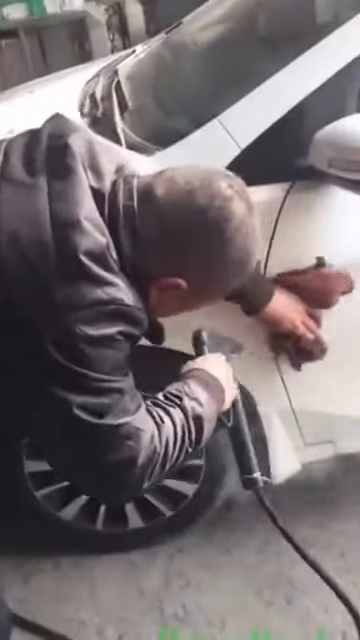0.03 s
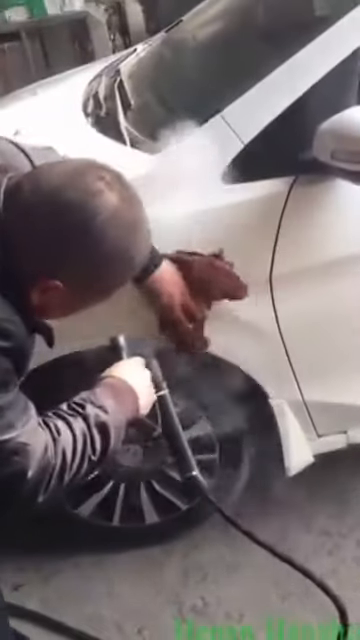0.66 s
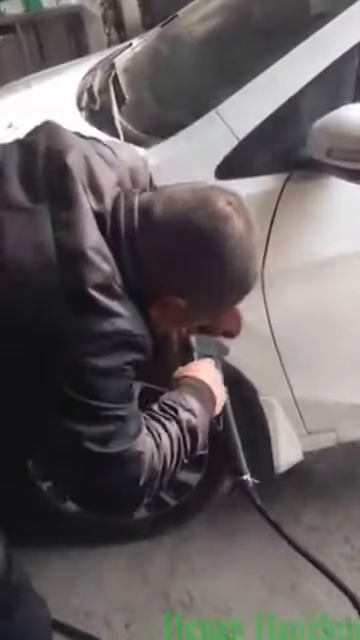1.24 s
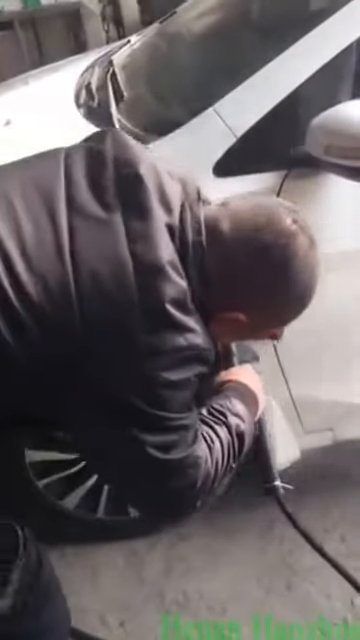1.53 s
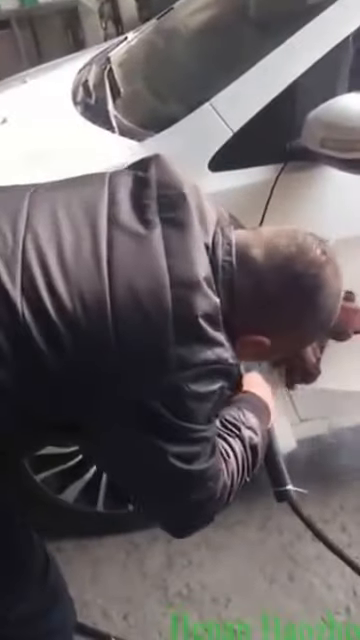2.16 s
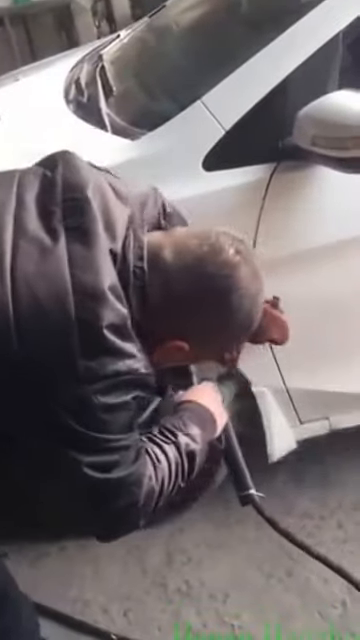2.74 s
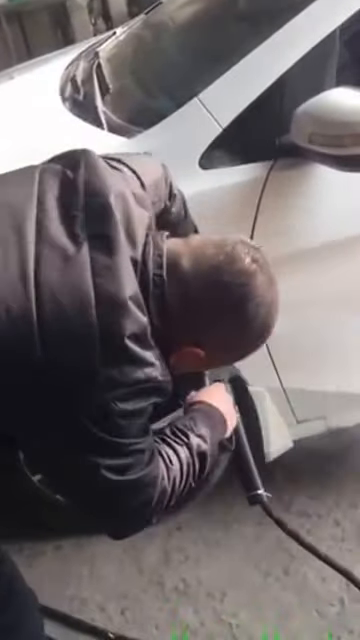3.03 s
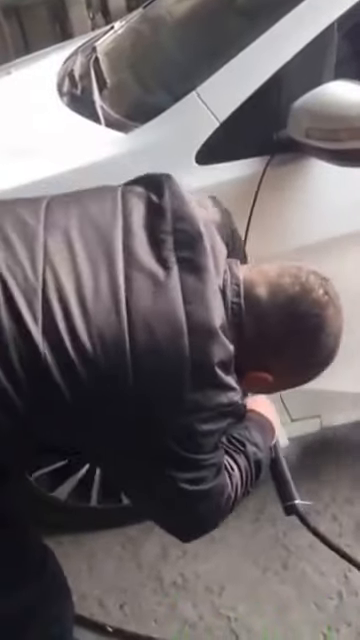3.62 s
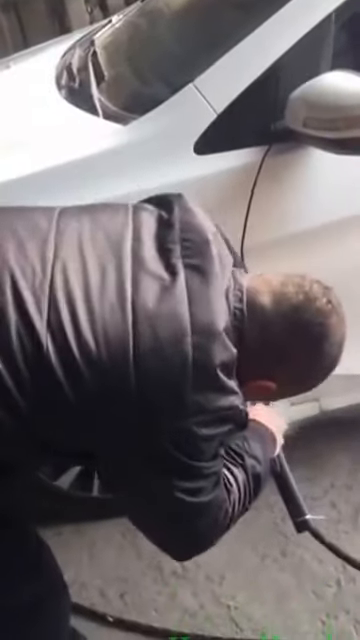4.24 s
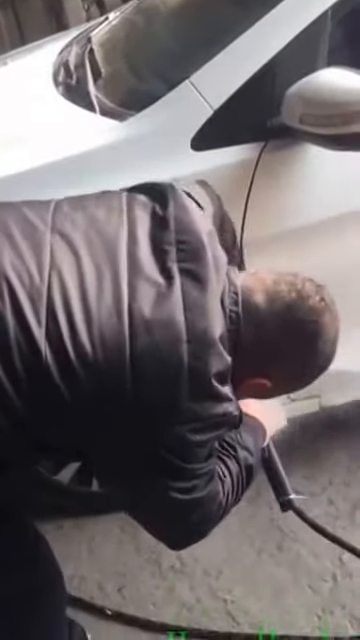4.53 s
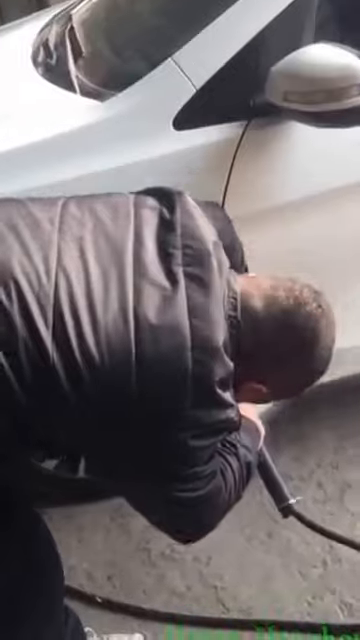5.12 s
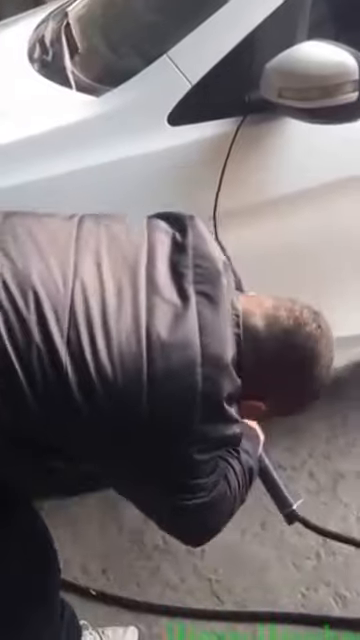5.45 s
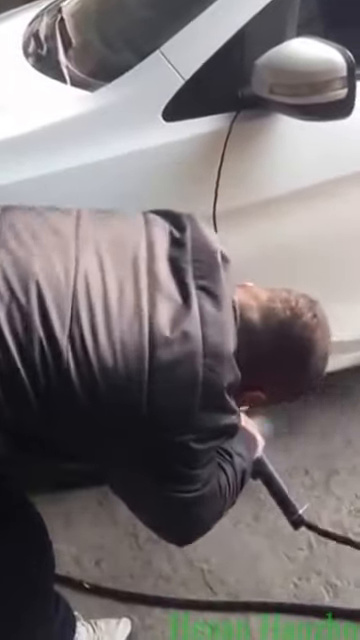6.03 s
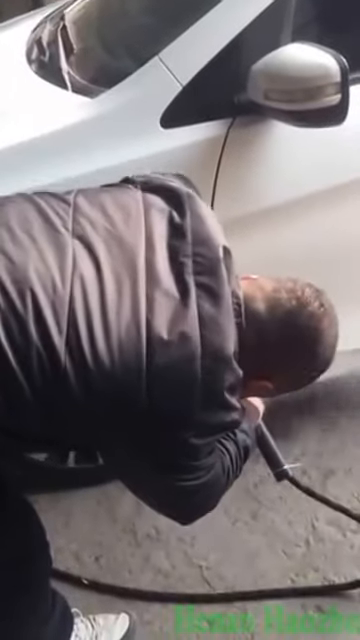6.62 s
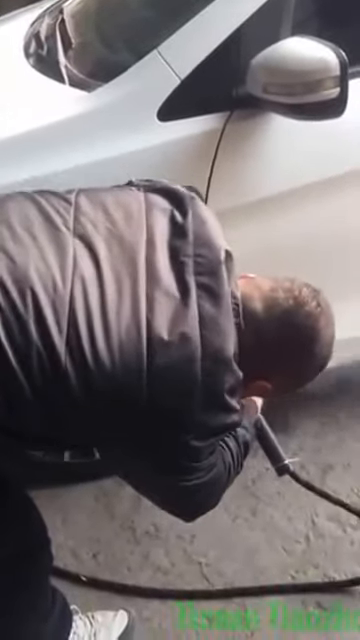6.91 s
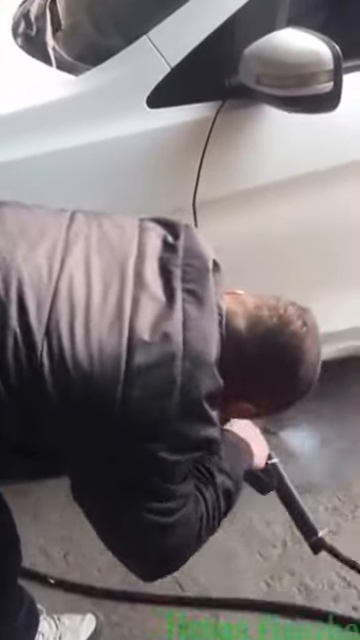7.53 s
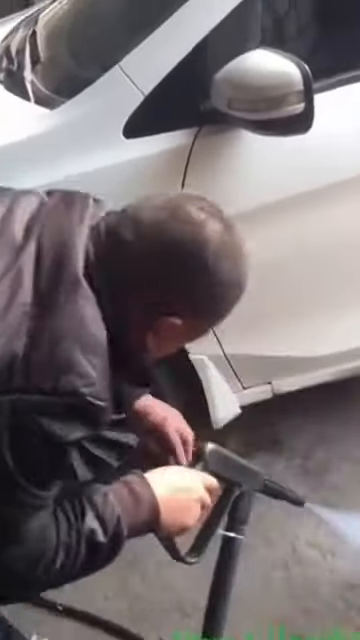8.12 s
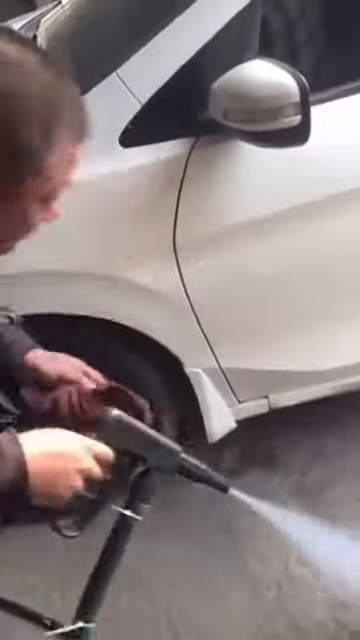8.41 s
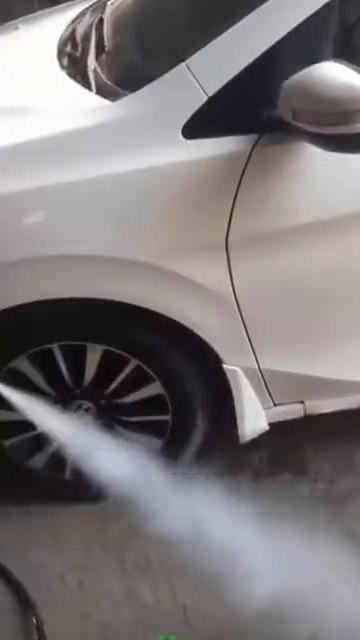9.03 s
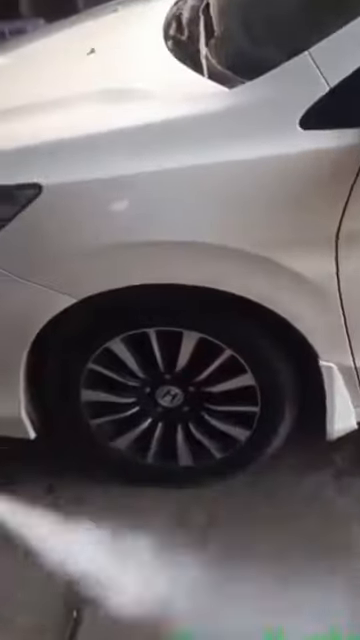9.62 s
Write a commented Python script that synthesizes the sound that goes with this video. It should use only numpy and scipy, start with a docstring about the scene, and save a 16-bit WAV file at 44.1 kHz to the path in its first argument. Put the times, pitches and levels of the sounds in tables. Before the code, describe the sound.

A steam gun hisses loudly and steadily against a car's side, turning hollow and sweeping near the end, over a faint machine hum.

```python
"""A steam gun hisses along the wheel arch and sill of a car, then swings out over the floor.
Its swirling jet roars on the bodywork, makes gaps ring and blows gusts and puffs at the microphone.
The echo off the nearest surface shifts as the gun moves, which gives a hollow, sweeping sound.
The machine hums with the mains, mostly in the first half. Both channels carry the same sound."""
import sys
import numpy as np
from scipy import signal
from scipy.io import wavfile
from scipy.ndimage import uniform_filter1d

SR = 44100
rng = np.random.default_rng(int(sys.argv[2]) if len(sys.argv) > 2 else 0)


def digitize_waveform(pressure):
    """Quantize a signal to 16-bit integers and store it at the path in sys.argv[1].

    Rows of a 2-D input are taken as channels; values are limited to [-1, 1].
    """
    field = np.atleast_2d(pressure).T
    bounded = np.clip(field, -1, 1)
    quanta = np.round(bounded * 32767).astype(np.int16)
    wavfile.write(sys.argv[1], SR, quanta)


N = 435266
# The jet is shaped on a grid: a row for each short frame of time, a column for each pitch.
FRAME, HOP = 1024, 256  # samples
TIMES = np.arange(N // HOP + 5) * HOP / SR
HZ = np.fft.rfftfreq(FRAME, 1 / SR)

# Tone colour of the four parts of the jet: pitch_hz, relative_db
HISS_COLOUR = [(1500, -43), (4000, -10.5), (5200, -6), (6300, -1.5), (7600, -1), (9000, 1), (9900, 0.5),
               (11300, 0), (11750, -0.5), (12100, -26)]
RUSH_COLOUR = [(200, -18.5), (600, -20), (1200, -9), (2000, -2.5), (2800, 0), (4300, -0.5), (5500, -2),
               (7500, -10.5), (12000, -40)]
ROAR_COLOUR = [(60, -38), (150, -12), (300, -10.5), (430, -7), (560, -1.5), (740, -1.5), (1000, 1),
               (1400, -2), (2000, -5), (3500, -20.5)]
RUMBLE_COLOUR = [(15, -32), (30, -19), (50, -9), (80, 6.5), (130, -5), (220, 0), (350, -5), (700, -4.5),
                 (2000, -50)]
# The hiss as the gun turns and the car body screens it: time_s, level_db
HISS_LEVELS = [(0, -20.5), (1.15, -21.5), (1.55, -18.5), (2.21, -22.5), (2.25, -16.5), (2.64, -25.5),
               (2.95, -20), (3.77, -17), (4, -24), (4.35, -22), (4.8, -18), (5.05, -22), (5.95, -22.5),
               (6.62, -18), (7.55, -24.5), (7.93, -21), (9.4, -19), (9.87, -21)]
# The rush of the steam cloud: time_s, level_db
RUSH_LEVELS = [(0, -28), (.75, -24), (1.08, -26.5), (1.65, -22.5), (2, -32.5), (2.7, -26.5), (3.62, -24),
               (4.15, -34), (4.78, -25.5), (5.58, -27), (5.87, -31), (6.6, -23), (7.2, -26.5),
               (7.45, -29.5), (7.72, -30.5), (7.9, -24.5), (8.3, -25), (8.45, -21.5), (9.87, -27.5)]
# Long passes and short hits on the bodywork: start_s, length_s, rise_s, roar_db, splash_db
BODY_HITS = [(0, 0.084, 0.019, -26.5, -30), (.15, 2.55, 0.56, -35.5, -35), (.83, .06, .03, -31.5, -23.5),
             (1.6, 0.32, 0.31, -28, -36), (2.08, 0.1, .05, -35, -27.5), (2.21, 0.094, 0.031, -29.5, -31),
             (2.9, 0.39, .025, -31.5, -33), (2.9, 1.87, .025, -34, -39), (2.9, 0.054, .02, -38, -25.5),
             (3.75, 0.25, 0.24, -29, -35), (4.8, .88, 0.76, -44.5, -37), (6.3, 0.28, 0.22, -25.5, -39),
             (6.35, 0.95, .15, -32.5, -36.5)]
# Air blown at the microphone: start_s, length_s, rise_s, level_db
AIR_GUSTS = [(0, .1, 0.046, -41), (1.5, 0.19, .1, -42), (4.25, 0.23, 0.15, -44.5), (5.7, .75, 0.28, -50),
             (6.35, 0.75, .15, -37.5), (7.58, 0.085, 0.067, -44), (7.82, 0.674, 0.14, -39.5),
             (8.7, 0.3, 0.063, -46.5), (9.22, .48, 0.12, -37)]
HIT_FADE_S, GUST_FADE_S = 0.091, 0.064
# Moving echo off the nearest surface: time_s, delay_ms, strength
MOVING_ECHO = [(0, 1.9, .05), (1.8, 1.61, .14), (4.5, 1.59, .14), (5.4, 1.74, .14), (7.75, 1.47, .14),
               (7.92, 1.4, .38), (8.22, 1.29, .5), (8.5, 1.32, .55), (8.72, 1.43, .5), (9, 1.715, .47),
               (9.55, 2.11, .27), (9.87, 2.63, .2)]
# Steady echoes off the bodywork (a minus flips the wave): delay_ms, strength
BODY_ECHOES = [(.39, -0.055), (.72, 0.049), (1.1, -0.0082), (3.26, -0.1)]
# Narrow bands where the sound is weaker: pitch_hz, width_hz, gain_db
NARROW_NOTCHES = [(4900, 170, -2), (10350, 240, -2.5)]
# Loudness of the mains hum: time_s, level_db
HUM_LEVELS = [(0, -51), (3.8, -47), (4.1, -53), (4.6, -53.5), (5, -64), (9.87, -63)]
# Tones that make up the hum: pitch_hz, relative_db
HUM_TONES = [(150, -3), (250, -1.5), (350, -26), (550, -1.5)]
# Puffs of air that thump the microphone: middle_s, level_db, pitch_hz
AIR_PUFFS = [(.08, -36, 70), (3.82, -34, 54.7), (4.425, -33, 80), (6.9, -35, 55), (8.91, -43, 120),
             (8.99, -45.5, 70), (9.46, -29, 55)]
# Gaps and edges that ring as the jet passes: middle_s, length_s, pitch_hz, boost_db
GAP_RINGS = [(0.856, .06, 2850, 5), (1.1, 0.97, 1700, 1.5), (1.848, 0.11, 1550, 5), (2.148, 0.14, 2880, 4),
             (2.196, 0.92, 580, 5), (2.33, 0.31, 7500, 2), (2.607, 0.11, 2370, 7), (2.797, 0.16, 3740, 3),
             (3.103, .25, 1900, 5.5), (3.187, 0.28, 11200, 5), (3.3, 0.81, 570, 3.5),
             (3.65, 0.44, 7100, 2.5), (3.703, 0.43, 2580, 5), (3.98, 0.18, 950, 5), (4.193, 0.29, 3400, 5),
             (4.302, .66, 404, 9), (4.845, 0.35, 7250, 4.5), (5.114, 0.32, 6480, 4), (5.45, 0.27, 1190, 6),
             (5.577, 0.32, 9300, 0), (6.413, 0.14, 3900, 3.5), (6.515, 0.17, 895, 2),
             (6.596, 0.068, 6700, 1.5), (7.302, 0.24, 1260, 5), (7.34, .1, 570, 10)]
# Brief dips in the whole jet: middle_s, length_s, gain_db
JET_DIPS = [(2.065, 0.055, -0.5), (2.202, 0.033, 0), (2.867, 0.076, -3.5), (5.83, .08, -1.5),
            (7.41, 0.047, -2), (8.86, 0.12, -2.5)]


def amp(db):
    """Turn decibels into a gain; squaring that gives power."""
    return 10 ** (np.asarray(db) / 20)


def evened(x):
    """Scale x to an average power of 1."""
    return x / np.sqrt(np.mean(x ** 2) + 1e-20)


def follow(rows, t=TIMES):
    """Join a table's points with straight lines: one upright curve per column after the time."""
    times_s, *columns = np.transpose(rows)
    return [np.interp(t, times_s, column)[:, None] for column in columns]


def bell(x, centre, width):
    """A bump of height 1, with the given width at half height."""
    return .5 ** ((2 * (x - centre) / width) ** 2)


def wobble(frames):
    """A smooth random curve that changes course about once in this many frames."""
    curve = rng.standard_normal((len(TIMES), 1))
    for _ in range(2):
        curve = uniform_filter1d(curve, frames, 0, mode="wrap")
    return evened(curve)


def patches(size):
    """Smooth random patches on the grid; size is (rows, columns)."""
    field = rng.standard_normal((len(TIMES), len(HZ)))
    for axis in (0, 1, 0, 1):
        field = uniform_filter1d(field, size[axis], axis, mode="wrap")
    return evened(field)


def swells(rows, fade_s):
    """Total power of events that rise, hold and die away: one curve per level column."""
    t = TIMES[:, None]
    total = 0
    for start_s, length_s, rise_s, *levels_db in rows:
        rise = np.clip((t - start_s) / rise_s, 0, 1)
        fade = np.exp(-np.maximum(t - start_s - length_s, 0) / fade_s)
        total += (amp(levels_db)[:, None, None] * rise * fade) ** 2
    return total


def swirl(colour, power, size, patchy_db):
    """Spread power over the pitches of a tone colour, in uneven patches like swirling air."""
    pitch_hz, relative_db = np.transpose(colour)
    tone = evened(amp(np.interp(np.log(HZ + 1), np.log(pitch_hz), relative_db)))
    return power * (tone * amp(patchy_db * patches(size))) ** 2


def steam_jet(flutter_db=0.05):
    """Swirling steam makes noise, which gaps and echoes then colour; two narrow bands are weakened."""
    roar_power, splash_power = swells(BODY_HITS, HIT_FADE_S)
    roar_power += amp(-41.5) ** 2  # the jet roars a little even in open air
    gust_power, = swells(AIR_GUSTS, GUST_FADE_S)
    power = hiss() + rush(splash_power) + roar(roar_power, gust_power) + rumble(roar_power, gust_power)
    power *= dips()
    # A gap gathers the jet's energy around its own pitch without adding any.
    ringing = ringing_gaps()
    ringing /= np.sqrt((power * ringing ** 2).sum(1) / power.sum(1))[:, None]
    flutter = amp(flutter_db * patches(size=(3, 300)))  # wet steam flutters very slightly
    notches = amp(sum(db * bell(HZ, hz, width_hz) for hz, width_hz, db in NARROW_NOTCHES))
    noise = rng.standard_normal(len(TIMES) * HOP)
    noise_grid = signal.stft(noise, nperseg=FRAME, noverlap=FRAME - HOP)[2].T[:len(TIMES)]
    shaped = noise_grid * np.sqrt(power) * ringing * flutter * echoes() * notches
    return signal.istft(shaped.T, nperseg=FRAME, noverlap=FRAME - HOP)[1][:N]


def hiss(tremble_db=0.67, tilt_db=1, pivot_hz=8500):
    """The finest swirls hiss, brighter and duller as the unsteady hand turns the nozzle."""
    octaves = np.clip(np.log2((HZ + 1) / pivot_hz), -1, 1)
    level_db = follow(HISS_LEVELS)[0] + tremble_db * wobble(frames=14)
    brightness_db = tilt_db * wobble(frames=16) * octaves
    return swirl(HISS_COLOUR, amp(level_db + brightness_db) ** 2, size=(4, 40), patchy_db=0.89)


def rush(splash_power):
    """The steam cloud rushes at middle pitches, louder where it splashes on the car."""
    power = amp(follow(RUSH_LEVELS)[0]) ** 2 + splash_power
    return swirl(RUSH_COLOUR, power, size=(4, 24), patchy_db=1.28)


def roar(roar_power, gust_power, gust_share_db=-7):
    """Bigger swirls roar on the bodywork, and each gust carries some roar too."""
    power = roar_power + gust_power * amp(gust_share_db) ** 2
    return swirl(ROAR_COLOUR, power, size=(3, 16), patchy_db=1.5)


def rumble(roar_power, gust_power, gusty_db=1, roar_share_db=-17.5, lumpy_db=8.0):
    """The biggest, slowest swirls buffet the microphone, in gusts and in lumps under the roar."""
    from_gusts = gust_power * amp(gusty_db * wobble(frames=8)) ** 2
    from_roar = roar_power * amp(roar_share_db + lumpy_db * np.tanh(wobble(frames=12))) ** 2
    return swirl(RUMBLE_COLOUR, from_gusts + from_roar, size=(3, 10), patchy_db=3.5)


def echoes(jitter_ms=0.019, faint_share=.25):
    """Echoes boost some pitches and cancel others; the pattern slides as the gun moves."""
    delay_ms, strength = follow(MOVING_ECHO)
    delay_ms = delay_ms + jitter_ms * wobble(frames=10)  # the swirling plume jitters the path
    phase_per_ms = -2j * np.pi * HZ / 1000
    near_gain = strength * 1.35 / np.sqrt(1 + (HZ / 8000) ** 4)  # a rough surface scatters top treble
    near = near_gain * np.exp(phase_per_ms * delay_ms)
    body = sum(gain * np.exp(phase_per_ms * ms) for ms, gain in BODY_ECHOES)
    paths = near + body + faint_echoes(faint_share)
    # Low sound comes from all along the steam cloud, so its echoes leave no pattern.
    bass_cut = HZ ** 2 / (HZ ** 2 + 900 ** 2)
    usual_gain = np.sqrt(1 + bass_cut ** 2 * (near_gain ** 2 + faint_share))
    return abs(1 + bass_cut * paths) / usual_gain


def faint_echoes(power_share, count=24, spread_ms=4.4, drift_ms=.35):
    """Weak echoes off wheel, body and floor; each delay drifts as gun and microphone move."""
    total = np.zeros((len(TIMES), len(HZ)), complex)
    for lateness, flip, pace, start in rng.random((count, 4)):
        sway = np.sin(2 * np.pi * ((.1 + .3 * pace) * TIMES + start))
        delay_ms = 1.5 - spread_ms * np.log(1 - .97 * lateness) + drift_ms * sway
        phase = 2 * np.pi * np.outer(delay_ms / 1000, HZ)
        total += np.sign(flip - .5) * np.exp(-1j * phase)
    return total * np.sqrt(power_share / count)


def mains_hum(waver_db=2):
    """The machine hums at odd multiples of the mains pitch, each tone wavering a little."""
    t = np.arange(N) / SR
    level_db = follow(HUM_LEVELS, t)[0][:, 0]
    wavers = patches(size=(12, 1)).T
    total = np.zeros(N)
    for (pitch_hz, relative_db), waver in zip(HUM_TONES, wavers):
        gain = amp(level_db + relative_db + waver_db * np.interp(t, TIMES, waver))
        total += gain * np.sin(2 * np.pi * (pitch_hz * t + rng.random()))
    return np.sqrt(2) * total


def air_puffs(cycles=0.55):
    """Each puff is one short push and pull of air on the microphone."""
    t = np.arange(N) / SR
    total = np.zeros(N)
    for middle_s, level_db, pitch_hz in AIR_PUFFS:
        wave = np.sin(2 * np.pi * pitch_hz * (t - middle_s))
        total += amp(level_db) * bell(t, middle_s, cycles / pitch_hz) * wave
    return total


def ringing_gaps(width_at_1khz_hz=400, widening=0.7, small_gaps_db=0.64):
    """Each gap boosts its own pitch as the jet passes; many small ones ring faintly at random."""
    total_db = 0
    for middle_s, length_s, pitch_hz, boost_db in GAP_RINGS:
        width_hz = width_at_1khz_hz * (pitch_hz / 1000) ** widening
        total_db += boost_db * bell(TIMES[:, None], middle_s, length_s) * bell(HZ, pitch_hz, width_hz)
    return amp(total_db + small_gaps_db * patches(size=(40, 7)))


def dips():
    """The share of the jet's power that is left as its level dips briefly."""
    gain_db = sum(db * bell(TIMES[:, None], middle_s, length_s) for middle_s, length_s, db in JET_DIPS)
    return amp(gain_db) ** 2


def scene():
    """Steam, hum and puffs, the same in both channels."""
    return np.tile(steam_jet() + mains_hum() + air_puffs(), (2, 1))


def record(dry, low_cut_hz=42, high_cut_hz=12080):
    """The microphone drops the deepest bass; then the highest treble is cut off."""
    bass_filter = signal.butter(4, low_cut_hz, "highpass", fs=SR, output="sos")
    treble_filter = signal.firwin(601, high_cut_hz, window=("kaiser", 9), fs=SR)
    return signal.oaconvolve(signal.sosfilt(bass_filter, dry), treble_filter[None], "same")


dry = scene()
out = record(dry)
digitize_waveform(out)
```